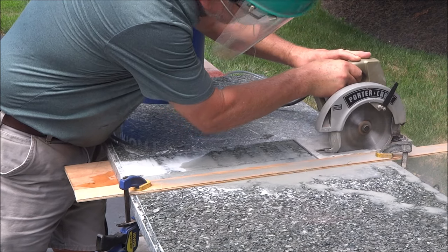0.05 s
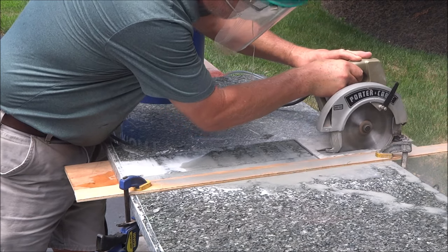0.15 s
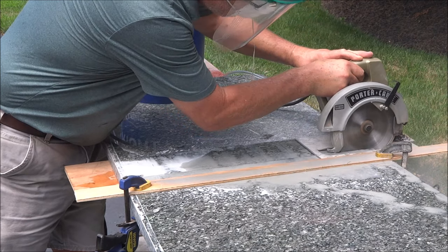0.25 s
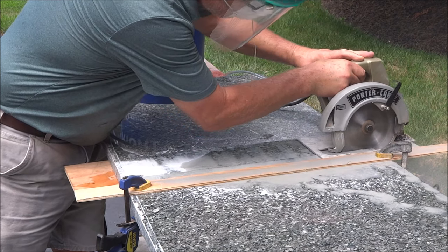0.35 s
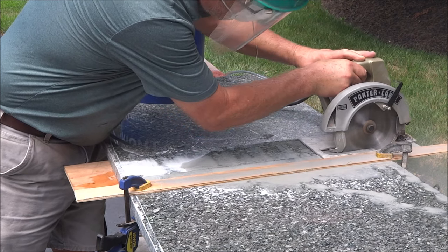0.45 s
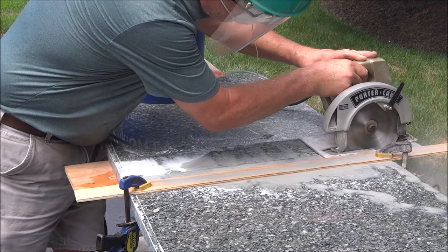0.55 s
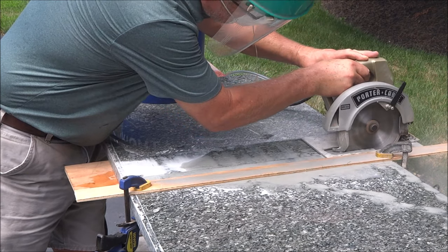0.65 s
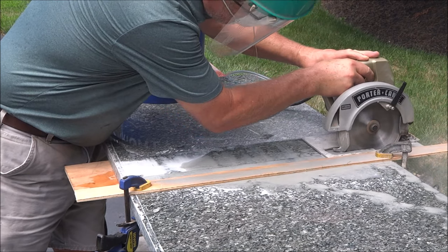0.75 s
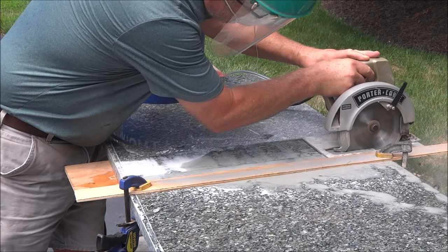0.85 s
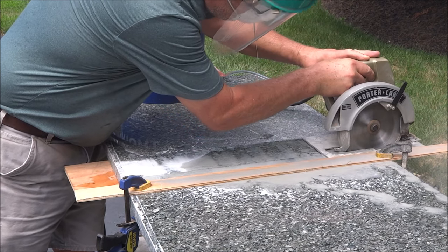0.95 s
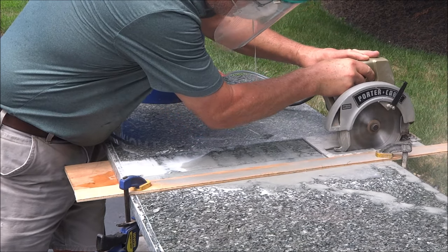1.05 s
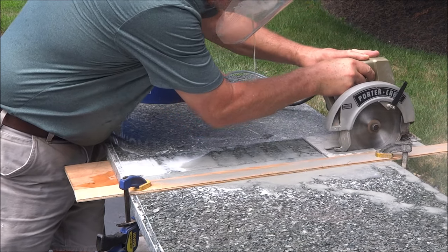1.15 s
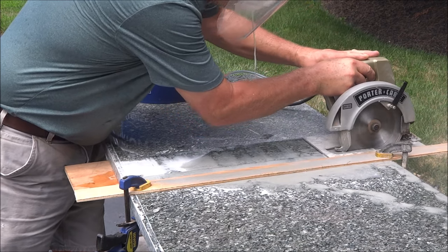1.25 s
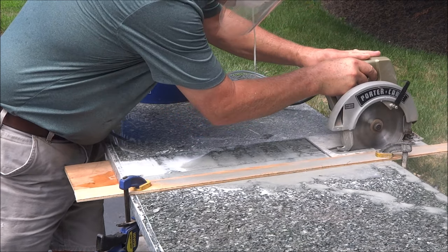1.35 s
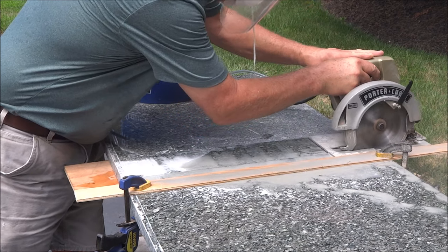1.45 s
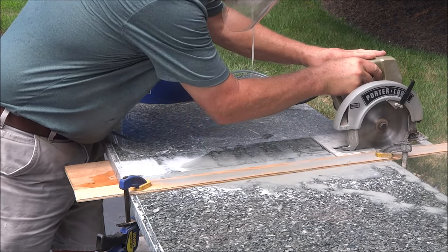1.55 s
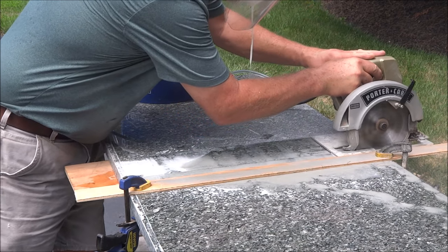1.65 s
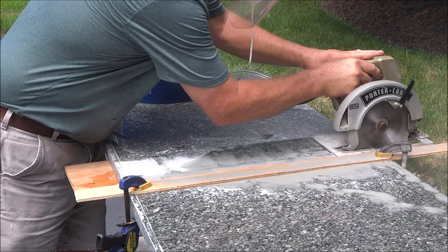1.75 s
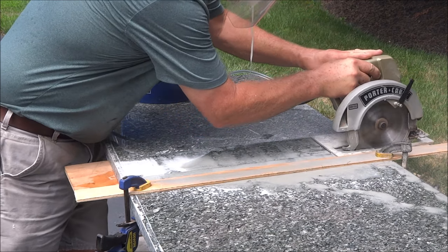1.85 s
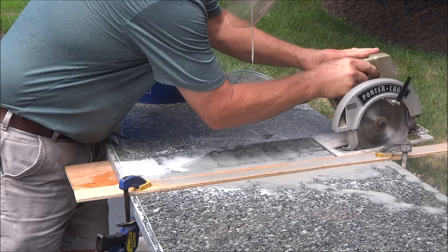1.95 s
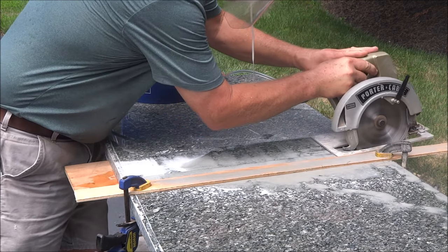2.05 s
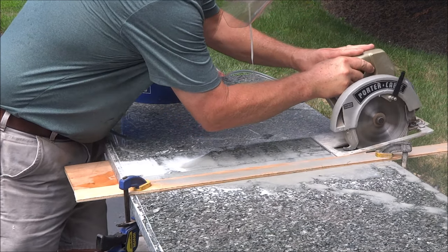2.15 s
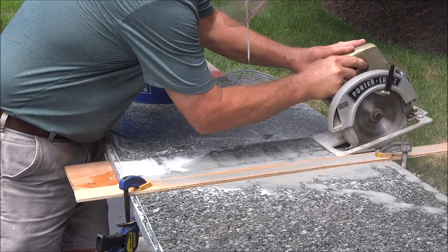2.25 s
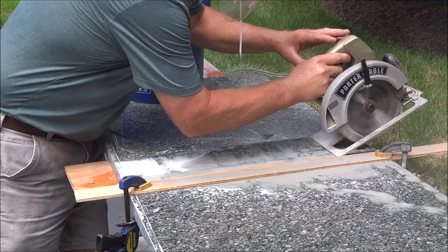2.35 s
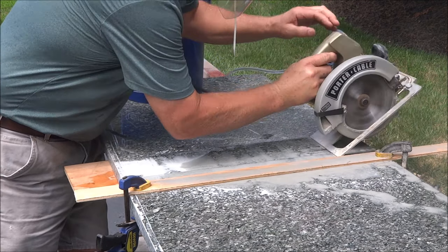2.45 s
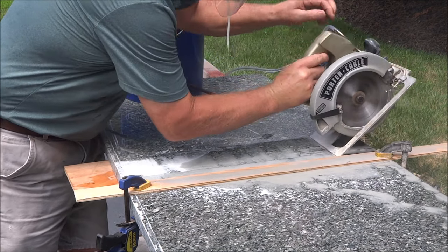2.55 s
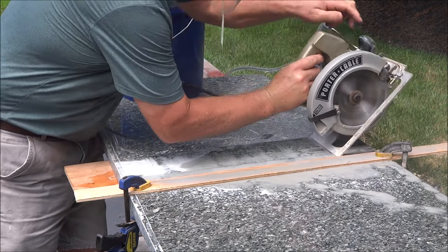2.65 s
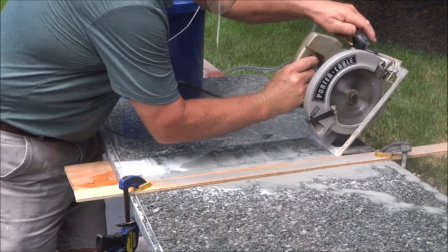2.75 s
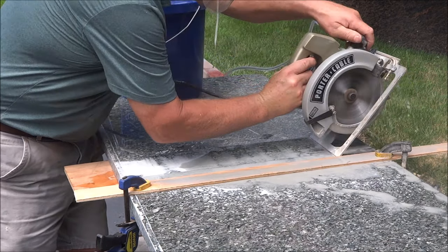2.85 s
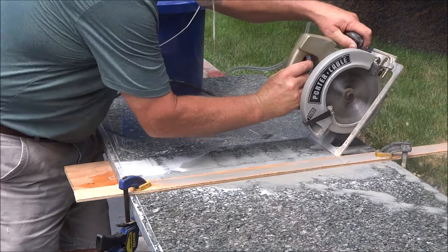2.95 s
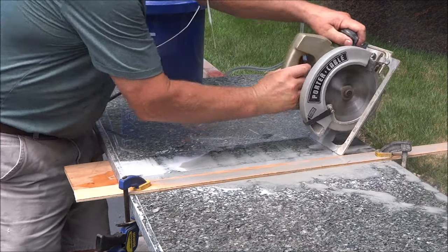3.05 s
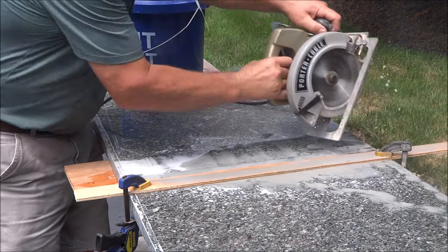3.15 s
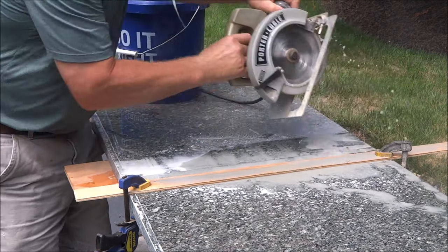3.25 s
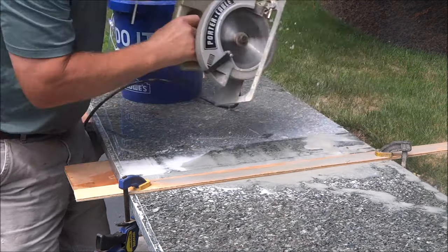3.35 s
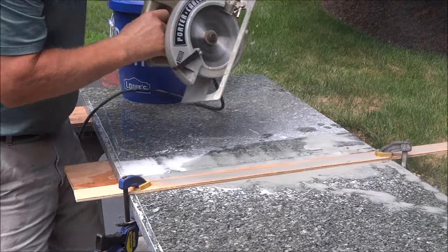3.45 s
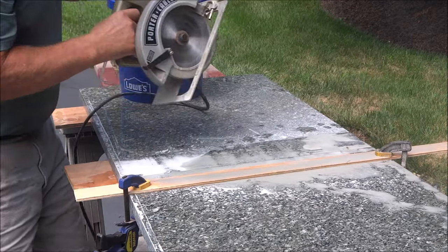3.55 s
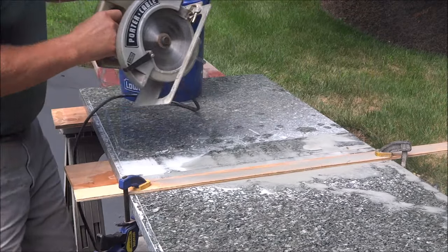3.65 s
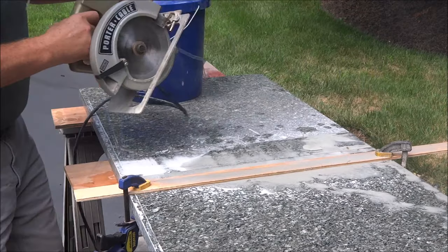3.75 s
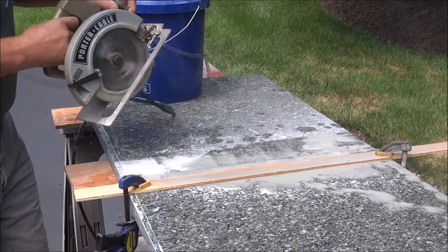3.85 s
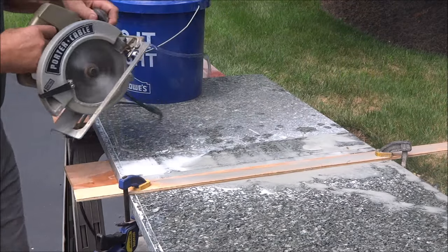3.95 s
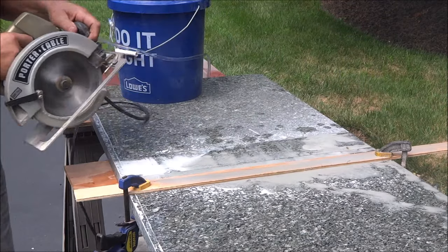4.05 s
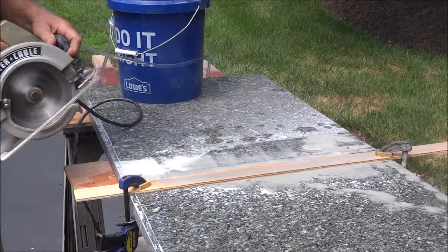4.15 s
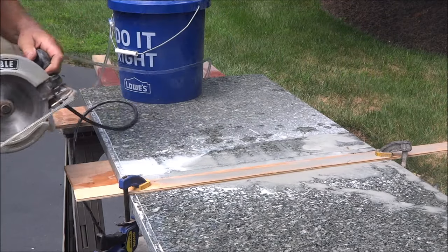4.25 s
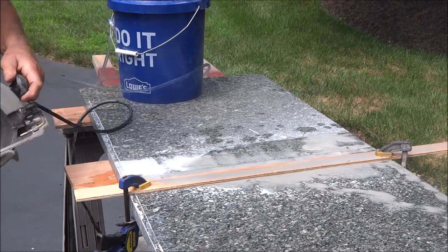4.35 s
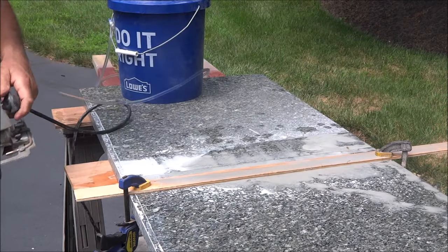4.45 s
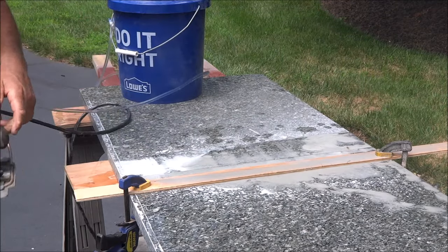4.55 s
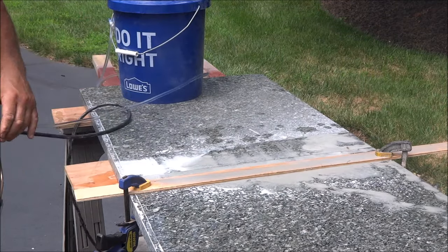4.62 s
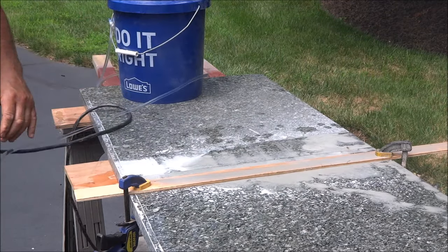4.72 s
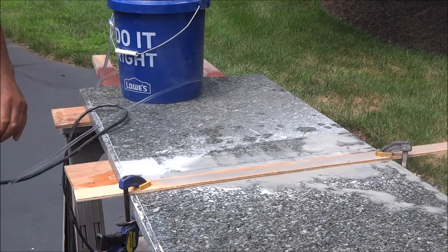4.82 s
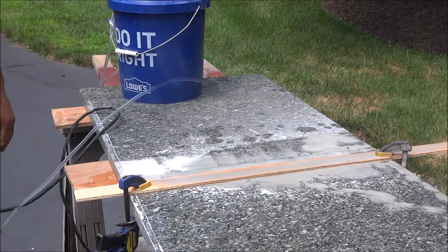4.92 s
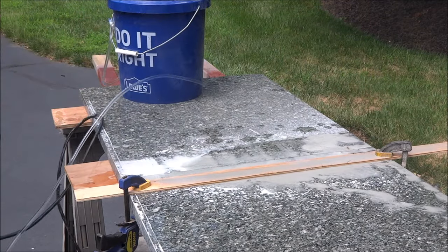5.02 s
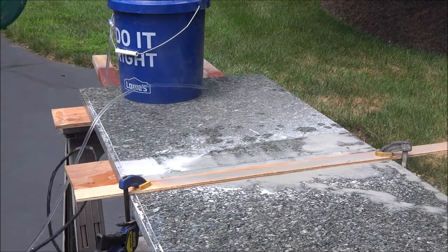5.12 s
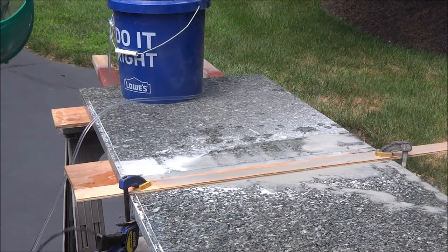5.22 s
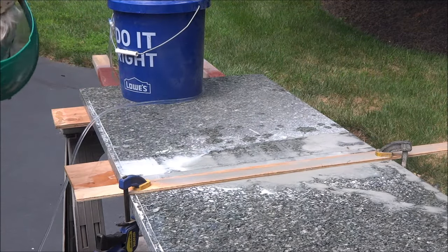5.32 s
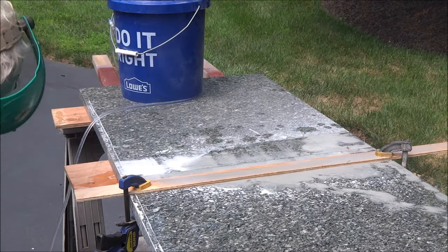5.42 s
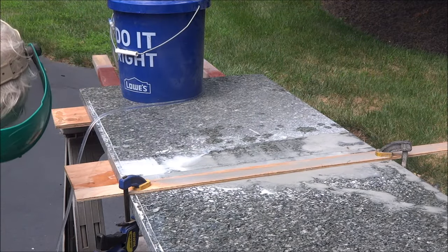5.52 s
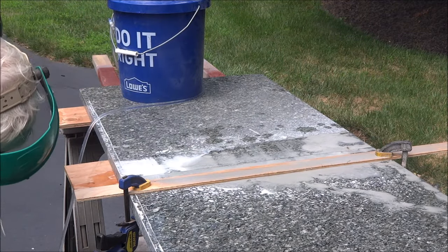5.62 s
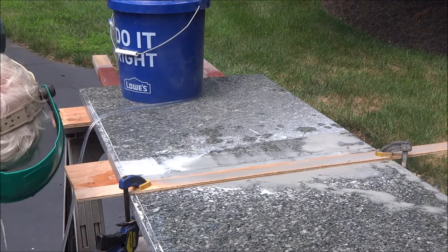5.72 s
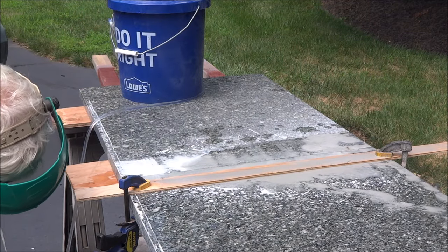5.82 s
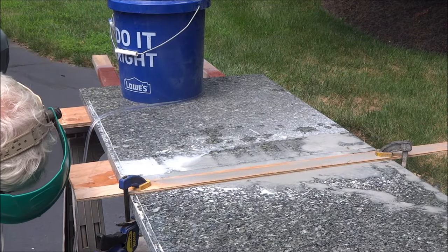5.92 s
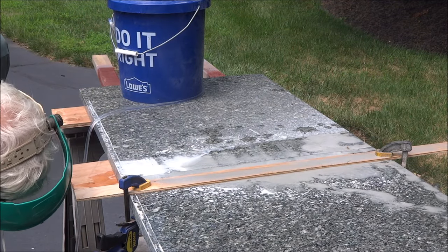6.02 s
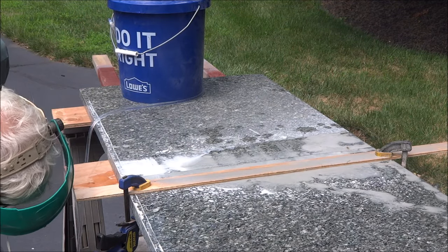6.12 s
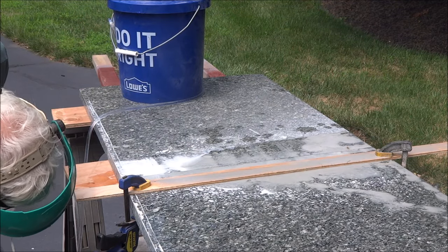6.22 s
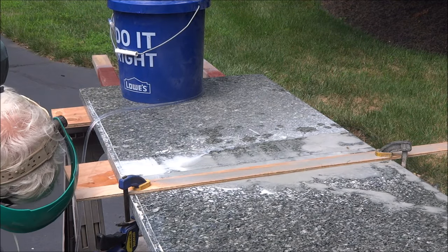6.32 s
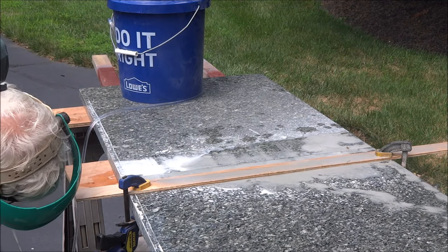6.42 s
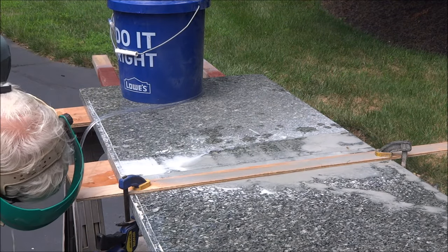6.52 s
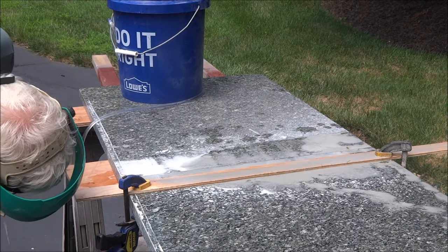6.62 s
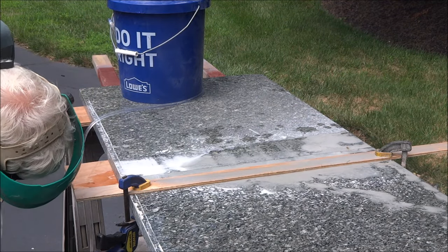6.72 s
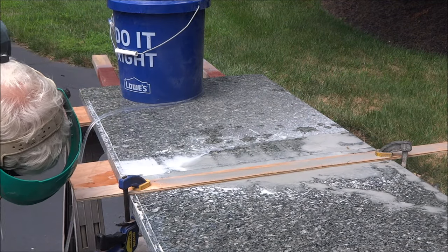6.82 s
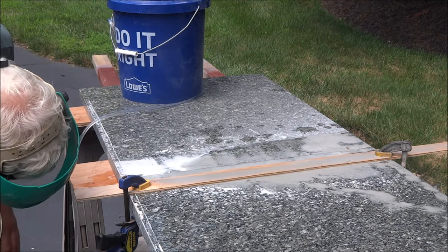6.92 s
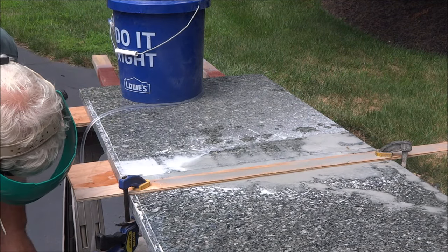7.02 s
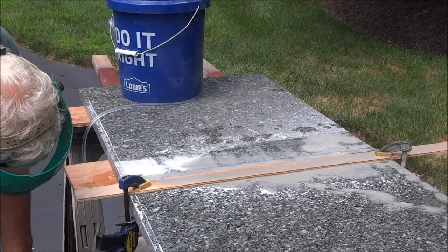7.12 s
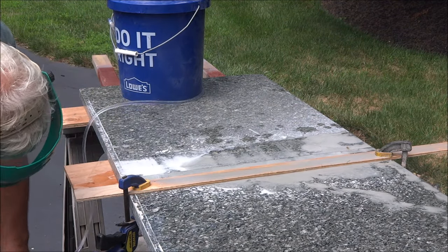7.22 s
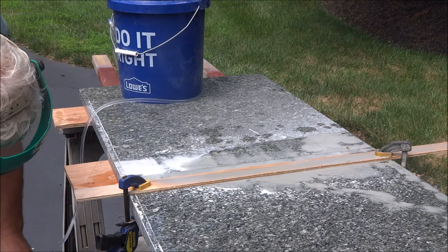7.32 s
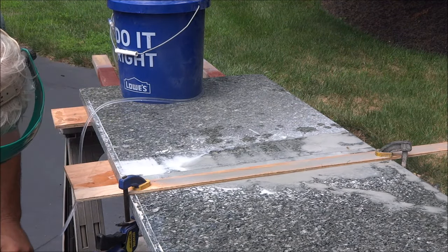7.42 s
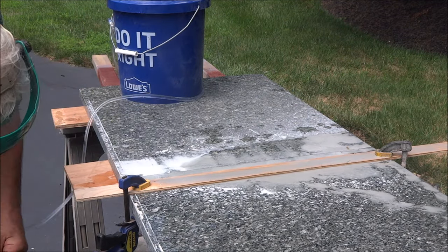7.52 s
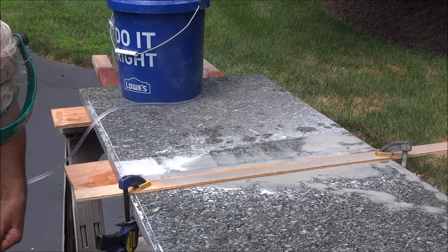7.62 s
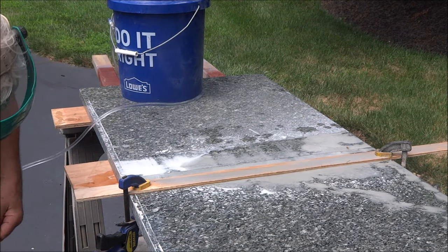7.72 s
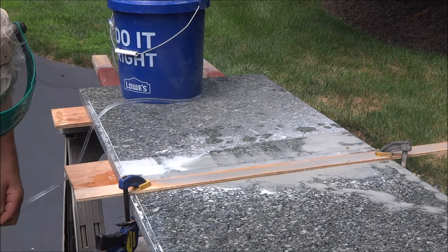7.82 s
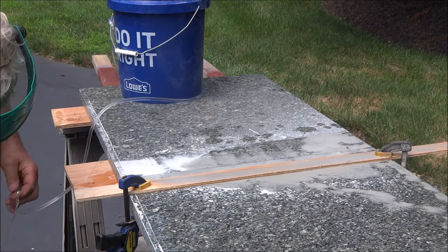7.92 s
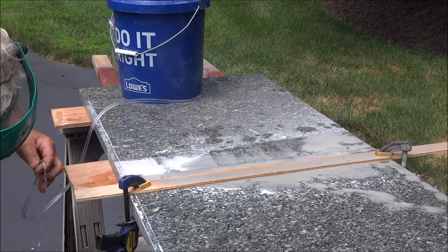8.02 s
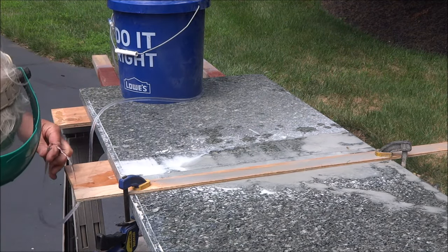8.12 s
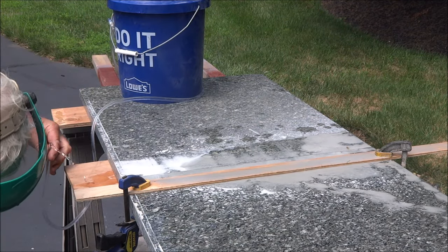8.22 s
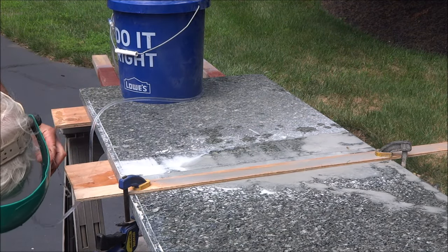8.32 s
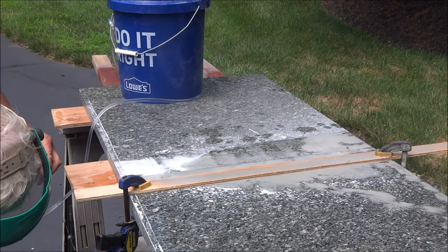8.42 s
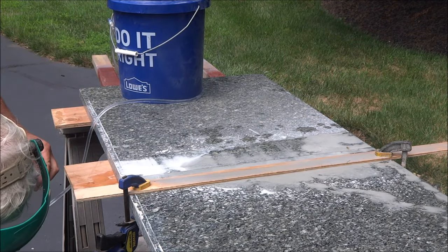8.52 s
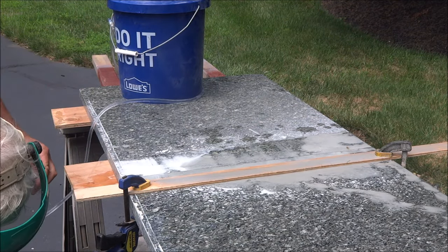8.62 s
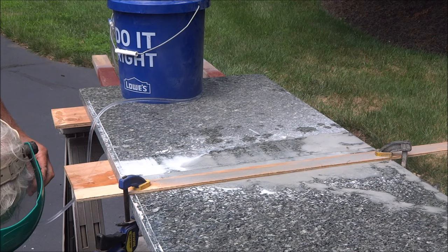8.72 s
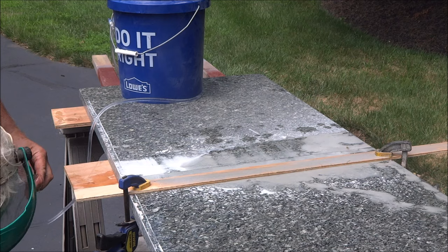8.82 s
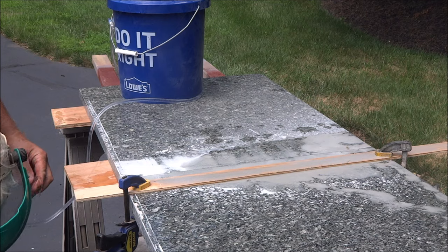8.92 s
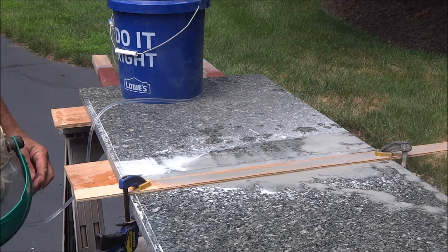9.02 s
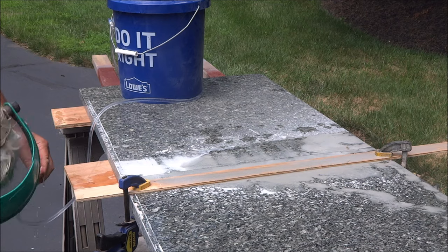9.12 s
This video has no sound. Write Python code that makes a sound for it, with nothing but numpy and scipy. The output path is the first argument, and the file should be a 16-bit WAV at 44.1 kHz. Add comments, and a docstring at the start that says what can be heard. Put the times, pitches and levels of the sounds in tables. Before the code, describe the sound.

From the start, a nearby handheld circular saw cuts a wet stone slab outdoors, making a gritty hiss with shifting, high metallic squeals. At about 0.7 seconds the motor begins to slow, and its whine falls in pitch from then on. At about 2.2 seconds the blade leaves the stone and the grinding and squealing stop, followed by a short knock at 2.5 seconds. The saw coasts on with a quieter whirr and a metallic gear rattle whose pulses gradually slow, shifting slightly left. Irregular sharp clacks begin around 3.7 seconds and come more often from 6 seconds. A soft, low outdoor rumble swells beneath, strongest after 7 seconds. At about 8.5 and 9 seconds the saw is set down with a few knocks of its metal base, still rattling slowly. There is very little echo.

```python
"""A hand-held circular saw ends a wet cut in a stone slab outdoors: friction excites the blade's bending
waves, which squeal as the kerf pinches them. The switch is let go and the motor's whine falls. At 2.2 s
the blade leaves the kerf, and the unloaded gears rattle once a turn in the resonant housing. The saw is
bumped and carried aside, clacking as it coasts down, while a low outdoor rumble swells.
From 8.4 s it is set down with a few knocks of its base plate."""
import sys
import numpy as np
from scipy import signal
from scipy.fft import rfft, irfft, next_fast_len
from scipy.io import wavfile
from scipy.ndimage import uniform_filter1d, map_coordinates

SR = 44100
rng = np.random.default_rng(int(sys.argv[2]) if len(sys.argv) > 2 else 0)


def log_audio(samples):
    """Write samples as a 16-bit WAV file to the path given in sys.argv[1]."""
    # one column per channel
    frames = np.atleast_2d(samples).T
    # limit to full scale, then quantise
    limited = np.clip(frames, -1, 1)
    pcm = np.round(limited * 32767).astype(np.int16)
    wavfile.write(sys.argv[1], SR, pcm)


N = 404302
TIME = np.arange(N) / SR


def amp(db):
    """Amplitude ratio of a level in dB."""
    return 10 ** (np.asarray(db) / 20)


def unit(x):
    """Normalisation to rms 1."""
    return x / np.sqrt(np.mean(np.abs(x) ** 2) + 1e-20)


def bump(x, middle, width):
    """Gaussian hump of height 1."""
    return np.exp(-np.abs(2 * (x - middle) / width) ** 2)


def curves(rows):
    """Linear interpolation of each column after the time."""
    s, *cols = np.transpose(rows)
    return [np.interp(TIME, s, c) for c in cols]


def wobble(rate, size=N):
    """Smooth random modulation, rate knots a second."""
    knots = rng.standard_normal(int(size * rate / SR) + 4)
    coarse = np.arange(0, size + 32, 32)
    return np.interp(np.arange(size), coarse, map_coordinates(knots, [coarse * rate / SR]))


def filtered(x, response):
    """Linear filtering: the spectrum times a frequency response."""
    m = next_fast_len(N + SR // 2)
    return irfft(rfft(x, m) * response(np.fft.rfftfreq(m, 1 / SR)), m)[..., :N]


def colour(points):
    """Spectral envelope through (frequency [Hz], level [dB]) points."""
    hz, db = np.transpose(points)
    return lambda f: amp(np.interp(np.log(f + 1), np.log(hz + 1), db))


def resonant(modes):
    """Resonators in cascade: each mode is met twice (gear case, then shell), so its skirts are steep."""
    return lambda f: sum(amp(db) * (1j * f * w / (c * c - f * f + 1j * f * w)) ** 2
                         for c, w, db in modes)


def dying(kicks, t60):
    """Exponential decay: each kick fades by 60 dB in t60 seconds."""
    return signal.lfilter([1], [1, -amp(-60 / (t60 * SR))], kicks)


# Blade shaft: (time [s], speed [turns/s])
SHAFT_SPEED = [(0, 80.7), (0.5, 81.8), (0.72, 82.2), (1, 76.9), (1.5, 68.3), (2, 60.7), (2.3, 57),
               (2.8, 52.0), (3.3, 46.97), (3.8, 42.54), (4.3, 38.57), (4.9, 34.21), (5.5, 30.14),
               (6.2, 25.65), (7, 20.81), (7.8, 16.42), (8.5, 13.2), (9.17, 11.02)]

def rotation():
    """Shaft speed and its integral, the turns made so far."""
    speed, = curves(SHAFT_SPEED)
    return speed, np.cumsum(speed) / SR


# A broad resonance near 930 Hz during the cut, perhaps the slab; the other rows are blade waves:
# (frequency at 70 turns/s [Hz], shift [Hz per turn/s], base width [Hz], level [dB])
CUT_MODES = [(934, 0.5, 130, 4), (1620, -5, 18, -27), (2218, -2, 10, -4), (2680, 4.5, 16, -6.5),
             (3080, -3.5, 8.7, -2.5), (3620, 4, 5.1, 0), (4068, -4, 3.9, 0), (4766, 7, 5.5, 0.5),
             (5110, -6, 6.7, -12.5), (5280, 10.5, 19, -11), (6015, 7, 17, -6), (6360, -8.5, 36, -10.5),
             (6850, 6.5, 17, -11), (7430, 8.5, 17, -9.5), (7660, -3, 50, -10), (8200, 8, 80, -9.5),
             (8950, 5.5, 17, -7.5), (9180, -4, 19, -17.5), (9960, -7, 20, -12.5), (10340, 8, 33, -9),
             (10950, -7.5, 88, -16)]
# Edges between drive bands: (frequency [Hz])
BAND_EDGES = [3300, 3900, 4400, 4900, 7000]
# Steady drive in each band: (level [dB])
BAND_DRIVE = [-32, -32, -30, -32, -24.5, -22]
# The kerf pinches a wave: (centre [s], length [s], wave frequency [Hz], rise [dB])
SQUEALS = [(.4, 0.28, 4061, 8.5), (0.74, 0.52, 4764, 9.5), (0.81, 0.11, 3640, 7), (1.15, 0.18, 3640, 12),
           (1.254, 0.42, 4764, 11.5), (1.55, .5, 3100, 6), (1.54, .2, 4061, 7.5), (1.62, 0.44, 3640, 7),
           (1.823, .3, 4061, 7.5), (2.045, 0.28, 4764, 8), (2.138, 0.16, 3640, 11.5),
           (2.153, .2, 3100, 10.5), (2.202, .3, 4061, 5.5), (.25, 0.38, 6010, 6), (1.45, 0.23, 6010, 5),
           (2.15, .25, 6010, 8.5), (1.65, 0.22, 6290, 8.5), (.15, 0.56, 5100, 6), (1.35, .3, 5100, 7)]
# Grinding hiss: (frequency [Hz], spectral level [dB])
GRIT_SPECTRUM = [(500, -70), (1500, -23), (2500, -4), (3700, 7), (5500, 1.5), (7500, -9.5), (9500, -2),
                 (11000, -9.5)]

def cut(turns):
    """Frictional excitation: grit hisses, driving a broad resonance and blade waves that spin detunes."""
    n, clear = round(2.6 * SR), round(2.2 * SR)
    t, out = TIME[:n], np.zeros(N)
    leaves_s, lift_s = 2.21, 0.072
    contact = np.clip((leaves_s + lift_s - t) / lift_s, 0, 1) ** 2
    for hz, shift, width, db in CUT_MODES:
        squeal_db = sum(rise * bump(t, s, length) for s, length, wave_hz, rise in SQUEALS
                        if abs(wave_hz / hz - 1) < .02)
        drive_db = BAND_DRIVE[np.searchsorted(BAND_EDGES, hz)] + squeal_db + db + 1.4 * wobble(2.35, n)
        grit = contact * amp(drive_db) * (rng.standard_normal(n) + 1j * rng.standard_normal(n))
        free_pole = np.exp(-np.pi * width * .9 / SR)  # clear of the stone the steel rings longer
        envelope = 0
        for share, spread in ((0.7, 1.0), (0.38, 2.1)):  # damping by the wet kerf adds a wider skirt
            pole = np.exp(-np.pi * width * spread / SR)
            gain = share * np.sqrt(1 - pole ** 2)
            held, state = signal.lfilter([gain], [1, -pole], grit[:clear], zi=[0j])
            released, _ = signal.lfilter([gain], [1, -free_pole], grit[clear:], zi=state)
            envelope += np.append(held, released)
        cycles = hz * t + shift * (turns[:n] - 70 * t)
        out[:n] += np.real(envelope * np.exp(2j * np.pi * cycles))
    out = filtered(out, lambda f: (1j * f / (550 + 1j * f)) ** 4)  # a thin disc radiates no bass
    hiss = unit(filtered(rng.standard_normal(N), colour(GRIT_SPECTRUM)))
    out[:n] += contact * amp(-26 + 2.5 * wobble(9.07, n) + .8 * wobble(26, n)) * hiss[:n]
    return out


def backlash(turns, spread_db, jitter_turns):
    """Backlash: the gear slack closes once a turn, with a kick of uneven size and timing."""
    due = np.arange(1, int(turns[-1])) + .30
    timing, size = rng.standard_normal((len(due), 2)).T
    kicks = np.zeros(N)
    kicks[np.searchsorted(turns, due + jitter_turns * timing).clip(0, N - 1)] = amp(spread_db * size)
    return kicks


def shaded(x, depth_db):
    """Acoustic shadowing by the hands and the saw's angle: random patches in time and frequency."""
    spectra = signal.stft(x, nperseg=512)[2]
    field = uniform_filter1d(rng.standard_normal(spectra.shape), size=5, axis=0)
    field = uniform_filter1d(field, size=24, axis=1)
    return signal.istft(spectra * amp(depth_db * unit(field)), nperseg=512)[1][:N]


# Gear noise as the saw is carried: (time [s], housing level [dB], treble level [dB], air level [dB])
GEAR_LEVELS = [(0, -23.5, -13.5, -34.5), (1, -24, -26, -32), (2.2, -22.5, -31, -37.5),
               (2.32, -30, -32, -30), (2.47, -26, -32.5, -28.5), (3.1, -32.5, -32, -31.5),
               (3.3, -36, -30, -34), (3.6, -33, -32.5, -37), (3.75, -28.5, -29, -34.5),
               (4.09, -31.5, -35, -33.5), (4.45, -22.5, -34.5, -34.5), (4.65, -27.5, -34, -34),
               (5.15, -27, -31.5, -32.5), (5.5, -27, -37.5, -32), (5.77, -24.5, -32, -35.5),
               (6.15, -29.5, -40, -42), (6.48, -23, -32.5, -36.5), (7.0, -25.5, -35, -32),
               (7.35, -24, -33.5, -34), (7.6, -22.5, -30, -34.5), (8.1, -23, -39, -36),
               (8.38, -20, -42, -38.5), (8.6, -24.5, -41.5, -38), (9.17, -23.5, -54, -41.5)]
# Dips in the rattle: (centre [s], length [s], level [dB])
LULLS = [(6.57, 0.14, -2), (7.06, 0.065, -4.5), (7.467, 0.037, -4.5), (8.136, .04, -4.5),
         (8.432, 0.021, -4), (8.903, 0.038, -5)]
# Directivity as the saw is turned: (time [s], upper housing modes against the lowest [dB])
FACING = [(0, -3.5), (2.3, 0.5), (3.4, 6.5), (4.4, 5.5), (5.6, 1), (6.2, -7.5), (6.8, 3.5), (7.4, 2),
          (7.65, 1.5), (7.9, -5), (9.17, 1)]
# Modes of housing, guard and cover plates: (frequency [Hz], width [Hz], level [dB])
HOUSING_MODES = [(1311, 109, 1), (1432.4, 98, -2), (1616, 129, -7), (1904, 190, -13)]
GUARD_MODES = [(3796, 142, 2), (4366, 63, -8), (5303, 89, -7), (10790, 230, -18)]
COVER_MODES = [(5820, 640, -2.5), (6550, 1100, 0.5), (7230, 820, -2)]
# Treble whirr and rush of air: (frequency [Hz], spectral level [dB])
WHIRR_SPECTRUM = [(1200, -25.5), (1900, -0.5), (2800, -1), (4000, -6), (6000, -11), (8500, -11),
                  (11000, -13.5)]
AIR_SPECTRUM = [(120, -35), (300, -14.5), (600, -3), (900, 3.5), (1200, 3.5), (1800, -13.5), (4000, -50)]

def gears(speed, turns):
    """Forced vibration: tooth noise, pulsed by backlash, rings housing, guard and covers over a whirr."""
    housing_db, treble_db, air_db = curves(GEAR_LEVELS)
    lull_db = sum(db * bump(TIME, s, length) for s, length, db in LULLS)
    slow_db = 10.5 * np.minimum(np.log2(speed / 14.8), 0)  # guard and whirr fade below 14.8 turns/s
    swing_db = 0.083 * (treble_db - treble_db.mean()) + lull_db + slow_db
    cutting = np.interp(TIME, [2.2, 2.3], [1, 0])  # in the stone the teeth stay pressed together
    force = (1 - cutting) * speed / 35  # slower gears hit more softly
    shared_kicks = backlash(turns, spread_db=2.5, jitter_turns=.05)

    def rattle(response, depth, t60):
        """Amplitude-modulated noise at a steady rms; each part rebounds in its own way."""
        kicks = shared_kicks * amp(1.1 * wobble(20)) + .4 * backlash(turns, spread_db=3, jitter_turns=.3)
        pulse = amp(0.91 * wobble(40)) * (1 + force * depth * dying(kicks, t60))
        sound = filtered(pulse * rng.standard_normal(N), response)
        return sound / np.sqrt(np.abs(uniform_filter1d(sound ** 2, size=SR // 4)) + 1e-20)

    facing_db, = curves(FACING)
    housing = covers = 0
    for i, mode in enumerate(HOUSING_MODES):
        mode_db = housing_db + lull_db - 4.5 + mode[2] + facing_db * (.5 if i else -.5)
        housing += amp(mode_db + 1.64 * wobble(3.005)) * rattle(resonant([mode]), depth=2, t60=0.061)
    guard_db = -35.5 + swing_db + 3 * cutting + 2.26 * wobble(12)
    guard = amp(guard_db) * rattle(resonant(GUARD_MODES), depth=3.2, t60=0.063)
    for mode in COVER_MODES:
        mode_db = treble_db + 3 * lull_db - 7.5 + mode[2] - 10 * cutting
        covers += amp(mode_db + 1.8 * wobble(6)) * rattle(resonant([mode]), depth=8.2, t60=0.031)
    whirr_db = -31 + swing_db - 12.5 * cutting + 1.3 * wobble(10)
    whirr = amp(whirr_db) * rattle(colour(WHIRR_SPECTRUM), depth=1.6, t60=0.079)
    air_db += lull_db / 2 + 0.78 * wobble(6)
    air = amp(air_db) * rattle(colour(AIR_SPECTRUM), depth=0.1, t60=0.071)
    return housing + guard + covers + shaded(whirr + air, depth_db=1.8)


# Speeds at which the case resonates: (armature rate [Hz], width [Hz], whine level [dB], hum level [dB])
CASE_RESONANCES = [(307, 34, -44, -55), (230, 21, -47, -70), (210.8, 19, -43, -49), (185, 36, -44, -70),
                   (151, 33, -46, -76), (119.6, 24, -48.5, -67), (97, 24, -51.5, -67), (79, 18, -43, -80)]
# Fan and tooth tones: (multiple of the armature rate, level [dB])
WHINE_HARMONICS = [(2, -17), (9, 5), (12, -10), (15, -8), (17, -8), (20, -4), (32, -12), (64, -11)]

def motor(speed, turns):
    """Rotational harmonics: unbalance hums, fan and teeth whine, and both swell at case resonances."""
    gear_ratio = 49 / 12
    whine_gain, hum_gain = sum(np.outer(amp([whine_db, hum_db]), bump(gear_ratio * speed, hz, width))
                               for hz, width, whine_db, hum_db in CASE_RESONANCES)
    angle = 2 * np.pi * gear_ratio * turns
    whine = sum(amp(db + 2.5 + 2 * wobble(5.9)) * np.sin(k * angle + 0.6 * wobble(30))
                for k, db in WHINE_HARMONICS)
    hum = amp(3) * np.sin(angle) + np.sin(3 * angle)
    return whine_gain * whine + hum_gain * hum


# Outdoor rumble, faint at first: (time [s], level [dB])
RUMBLE_LEVELS = [(0, -68), (.7, -84), (1.9, -82), (2.4, -65), (4.6, -58.5), (5.8, -54), (7.4, -47.5),
                 (9.17, -49)]
# Its colour: (frequency [Hz], spectral level [dB])
RUMBLE_SPECTRUM = [(12, -35), (20, -4.5), (65, -0.5), (317, -10), (450, 0.5), (580, -6), (990, -120)]

def rumble():
    """Partial coherence: low ambient noise, mostly alike left and right."""
    mid, side = filtered(rng.standard_normal((2, N)), colour(RUMBLE_SPECTRUM))
    level_db = curves(RUMBLE_LEVELS)[0] + 1.5 * wobble(4)
    return amp(level_db) * unit(mid + .27 * side * np.array([[1], [-1]]))


# Bumps on the base plate: (time [s], level [dB], relative crack level [dB])
KNOCKS = [(2.46, -15, 6), (8.445, -12, 2), (8.455, -13, 2), (8.481, -10, -2), (8.941, -6, 3),
          (8.995, -19, 9), (9.026, -17, 4)]
# Its modes: (frequency [Hz], level [dB], 60 dB decay time before clipping [s])
PLATE_MODES = [(253, -10, 0.27), (472, -3, 0.036), (1028, 2, 0.036), (1320, -25, 0.2), (1730, 2.5, 0.044),
               (2550, -4.5, 0.21)]

def knocks():
    """Impact excitation: each bump gives a crack and rings the plate's damped modes at new strengths."""
    out, t = np.zeros(N + SR), TIME[:SR // 4]
    for s, db, crack_db in KNOCKS:
        ring = sum(amp(mode_db + rng.normal(0, 4.3) - 60 * t / np.clip(t60, .012, .05))
                   * np.sin(2 * np.pi * hz * t) for hz, mode_db, t60 in PLATE_MODES)
        crack = amp(crack_db - 60 * t / 0.006) * rng.standard_normal(len(t))
        out[round(s * SR):][:len(t)] += amp(db - 9) * (ring + crack)
    return filtered(out[:N], lambda f: (1j * f / (170 + 1j * f)) ** 2)  # too small to radiate bass


# Hardest tooth blows: (time [s], level [dB], relative drive of guard and covers [dB])
CLACKS = [(3.7015, -16, -6), (4.4448, -14, -18), (4.5333, -11, -11), (4.6645, -17, -15),
          (5.2017, -13.5, -12), (5.4544, -14, -13), (5.8227, -19, -3.5), (5.8985, -20, -7.5),
          (6.004, -12, -19), (6.038, -15, -11.5), (6.0758, -12, -11), (6.1469, -14, -11.5),
          (6.18, -15.5, -10), (6.3037, -13.5, -9.5), (6.6633, -10.5, -17), (6.7416, -21, -11),
          (6.9072, -15.5, -5), (7.2981, -11, -6.5), (7.4144, -12, -17), (7.5777, -11, -8),
          (7.8106, -8.5, -18), (7.8768, -12.5, -12), (7.944, -15, -15), (8.0008, -8.5, -16),
          (8.2033, -16, -14), (8.2761, -15, -11.5), (8.3446, -10.5, -13), (8.4108, -10.5, -13.5),
          (8.4821, -6, -14), (8.577, -14.5, -13), (8.979, -11, -15), (9.1067, -12.5, -16)]

def clacks():
    """Impulse response: a tooth blow and its short scrape ring housing, guard and covers."""
    blows = np.zeros((3, N))
    for s, db, bright_db in CLACKS:
        blows[:, round(s * SR)] = amp([db, db + bright_db, db + bright_db])
    housing, guard, covers = blows + .5 * dying(blows, t60=0.021) * rng.standard_normal((3, N))
    return (amp(28.5) * filtered(housing, resonant(HOUSING_MODES))
            + amp(31.5) * filtered(guard, resonant(GUARD_MODES))
            + amp(13.5) * filtered(covers, resonant(COVER_MODES)))


def yard(x):
    """Diffuse reflection: slab, ground and far walls scatter a short tail, different on each side."""
    t = TIME[:SR // 4]
    tail = rng.standard_normal((2, len(t))) * amp(-60 * t / 0.19)
    tail /= np.linalg.norm(tail, axis=1, keepdims=True)
    delayed = np.pad(x, (200, 0))
    return signal.fftconvolve(delayed[None], tail, axes=1)[:, :N]


# Direction of the saw: (time [s], left minus right level [dB])
PAN = [(0.0, -1.0), (2.78, -1.0), (4.65, 2.0), (6.23, 1.0), (7.66, 2.0), (9.17, 1.5)]

def scene():
    """Superposition of the saw, panned as it is carried, its reflections and the rumble."""
    speed, turns = rotation()
    saw = cut(turns) + gears(speed, turns) + clacks() + motor(speed, turns) + knocks()
    pan_db, = curves(PAN)
    return saw * amp([pan_db / 2, -pan_db / 2]) + amp(-13) * yard(saw) + rumble()


def record(dry):
    """Band limiting: a steep low-pass at 11 kHz."""
    return filtered(dry, lambda hz: amp(-np.clip(hz - 11000, 0, None) / 2.5))


dry = scene()
out = record(dry)
log_audio(out)
```